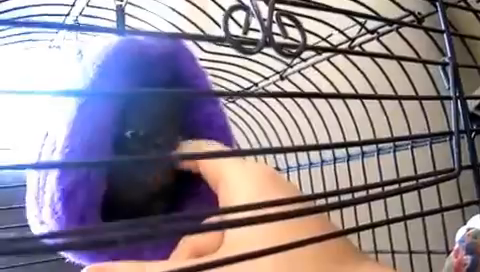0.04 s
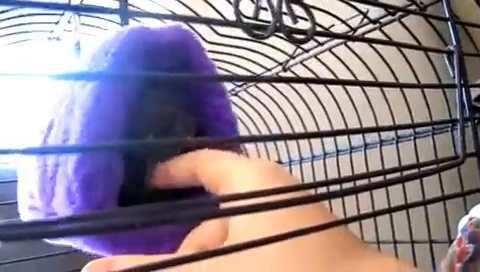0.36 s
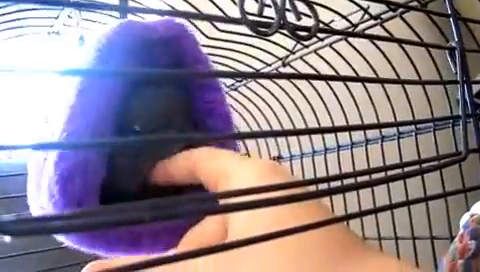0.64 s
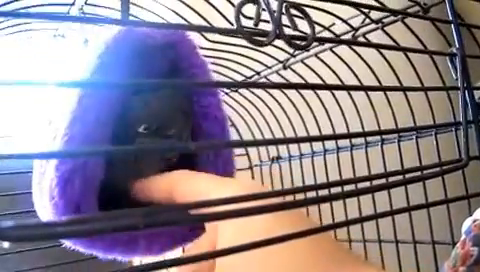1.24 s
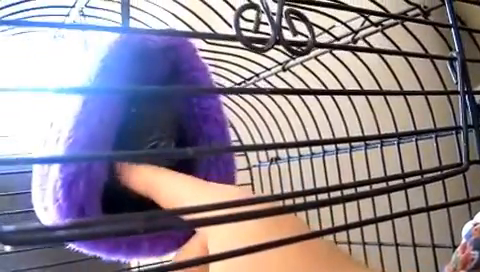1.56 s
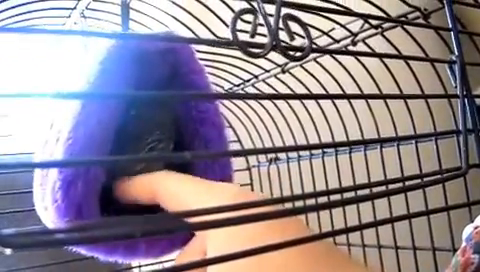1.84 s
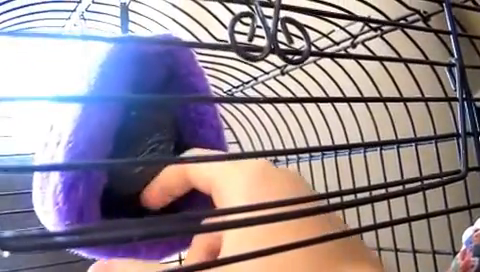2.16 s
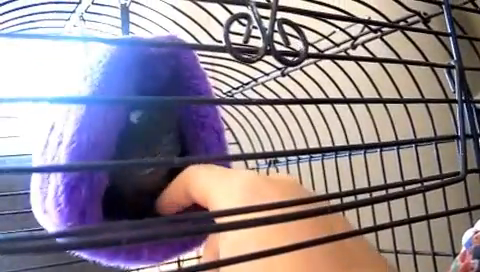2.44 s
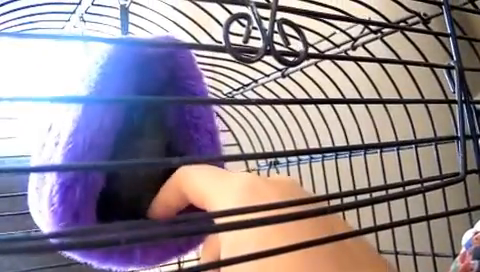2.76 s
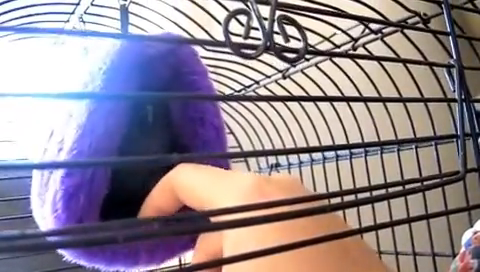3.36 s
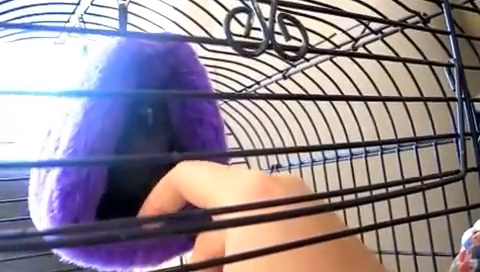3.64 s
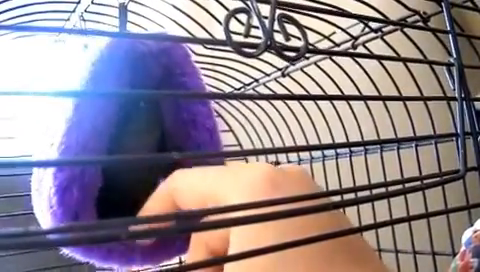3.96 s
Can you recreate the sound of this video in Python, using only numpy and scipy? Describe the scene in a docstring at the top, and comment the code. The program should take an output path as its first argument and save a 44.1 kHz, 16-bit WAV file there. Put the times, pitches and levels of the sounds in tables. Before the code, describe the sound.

One raspy parrot squawk bursts out close to the microphone in a small room. It follows a quiet stretch of low appliance hum, faint squeaks, a finger brushing the bird's cloth hut and two dry ticks in the cage.

```python
"""An appliance hums in a small room. Near the stereo microphones a finger rubs and nudges a parrot's
fabric hut inside a wire cage, with faint squeaks and two ticks of beak or claw. At the end the
pestered bird lets out one harsh squawk: an unsteady syrinx tone near 1.2 kHz, buried in chaotic
rasp and scattered by the cage and the room. The recorder's gain ducks under it."""
import sys
import numpy as np
from scipy import signal
from scipy.fft import rfft, irfft
from scipy.io import wavfile
from scipy.ndimage import uniform_filter1d

SR = 44100
rng = np.random.default_rng(int(sys.argv[2]) if len(sys.argv) > 2 else 0)


def put_to_file(sound):
    """Save the sound as 16-bit audio at rate SR, in the file named by the first command-line argument."""
    columns = np.atleast_2d(sound).T  # one column per channel
    safe = np.clip(columns, -1, 1)
    whole_steps = np.round(safe * 32767)
    wavfile.write(sys.argv[1], SR, whole_steps.astype(np.int16))


N = 176400
T = np.arange(N) / SR
CAGE_T60_S, ROOM_T60_S = 0.05, 0.24


def amp(db):
    """Decibels to gain."""
    return 10 ** (np.asarray(db) / 20)


def unit(x):
    """Scale to rms 1."""
    return x / np.sqrt(np.mean(x ** 2) + 1e-20)


def at_hz(points, hz):
    """Read a spectrum on a log-frequency axis."""
    freqs, values = np.transpose(points)
    return np.interp(np.log(hz + 1), np.log(freqs), values)


def colour(x, points):
    """Filter by a spectrum in dB."""
    size = 2 * x.shape[-1]
    gain = amp(at_hz(points, np.fft.rfftfreq(size, 1 / SR)))
    return irfft(rfft(x, size) * gain)[..., :size // 2]


def drift(rate_hz):
    """Smooth random wander with rms 1."""
    r = np.exp(-2 * np.pi * rate_hz / SR)
    return unit(signal.lfilter([1], [1, -2 * r, r * r], rng.standard_normal(N + SR))[SR:])


def resonate(x, hz, width_hz):
    """Resonance with gain 1 at its peak."""
    r = np.exp(-np.pi * width_hz / SR)
    poles = [1, -2 * r * np.cos(2 * np.pi * hz / SR), r * r]
    return signal.lfilter(np.array([1, 0, -1]) * (1 - r * r) / 2, poles, x)


# Likeness of the noise at the two microphones: (frequency [Hz], correlation [0-1])
MIC_LIKENESS = [(100, .96), (400, .93), (1000, 0.63), (3000, 0.2), (10000, 0.07)]
def stereo_noise(spectrum):
    """Coloured noise, alike at both microphones in the bass and diffuse in the treble."""
    mid, side = rfft(rng.standard_normal((2, N)))
    alike = at_hz(MIC_LIKENESS, np.fft.rfftfreq(N, 1 / SR))
    pair = np.sqrt(1 + alike) * mid + np.sqrt(1 - alike) * side * [[1], [-1]]
    return unit(colour(irfft(pair, N), spectrum))


# Room tone all around the microphones: (frequency [Hz], relative level [dB])
ROOM_AIR = [(15, -51), (25, -8), (82, -4), (148, -13), (198, -5.5), (253, -15.5), (297, -7.5), (495, -16),
            (567, -16.5), (684, -20.5), (826, -20), (2360, -29), (5430, -30), (12800, -38.5), (15500, -43)]
def room_tone():
    """Soft, steady noise, strongest in the bass."""
    return amp(-50) * stereo_noise(ROOM_AIR)


# Appliance in the background: (frequency [Hz], level [dB])
HUM_LINES = [(97.4, -56.5), (100.2, -57.5), (150, -62.5), (199.8, -52.5), (247, -63), (300, -54),
             (598, -69)]
def appliance_hum():
    """Slowly wavering hum lines; the lowest two beat."""
    hum = np.zeros(N)
    for hz, db in HUM_LINES:
        gain = np.sqrt(2) * amp(db + 1.1 * drift(1.4))
        hum += gain * np.sin(2 * np.pi * hz * T + rng.uniform(0, 2 * np.pi) + 0.071 * drift(0.71))
    return hum


def arch(start, length):
    """Half a sine: one rise and fall."""
    return np.sin(np.pi * np.clip((T - start) / length, 0, 1))


# Barely above the room tone: (time [s], length [s], pitch [Hz], level [dB])
FAINT_SQUEAKS = [(0.387, 0.16, 3110, -69), (0.587, 0.095, 1536, -64), (0.746, .1, 1650, -65)]
def squeaks():
    """Thin, wavering tones that swell and fade."""
    out = np.zeros(N)
    for start, length, hz, db in FAINT_SQUEAKS:
        phase = 2 * np.pi * np.cumsum(hz * (1 + 0.018 * drift(150))) / SR
        out += amp(db) * arch(start, length) * np.sqrt(2) * np.sin(phase)
    return out


def friction(strokes, spectrum, grain_db):
    """Grainy noise that swells and fades with each stroke."""
    swell = sum(amp(db) * np.sqrt(np.abs(arch(start, length))) for start, length, db in strokes)
    return swell * unit(stereo_noise(spectrum) * amp(grain_db * drift(86)))


# Finger on the hut, in the cage: (time [s], length [s], level [dB])
FINGER_RUBS = [(.245, 0.034, -54), (.272, 0.061, -58.5), (.33, 0.28, -61), (.65, 0.32, -62.5),
               (.924, 0.024, -54), (1.075, 0.029, -59), (1.3, 0.27, -64), (2.42, .2, -70),
               (2.74, 0.33, -59), (3.03, 0.27, -58), (3.25, 0.22, -65)]
HUT_NUDGES = [(.742, 0.1, -48.5), (3.107, 0.025, -45), (3.225, 0.012, -47.5)]
# Colour of the hut's cloth and of its body: (frequency [Hz], relative level [dB])
CLOTH_COLOUR = [(600, -27), (1600, -8), (2300, -8), (3100, -4.5), (5000, -3.5), (6200, -5.5), (7200, -3),
                (9000, -17), (15000, -30)]
HUT_COLOUR = [(80, 2), (200, 1), (340, -2), (410, 6), (520, 3), (680, -1.5), (1500, -14), (3000, -24),
              (9000, -40)]
def finger_on_hut():
    """Rubbing makes the cloth hiss; nudging draws a dull bump from the whole hut."""
    rubs = friction(FINGER_RUBS, CLOTH_COLOUR, grain_db=1.5)
    nudges = friction(HUT_NUDGES, HUT_COLOUR, grain_db=2)
    return rubs + nudges


# Beak or claw in the cage: (time [s], strike level [dB])
BEAK_TICKS = [(3.1893, -25.5), (3.286, -40)]
# What each tick rings: (frequency [Hz], relative level [dB], time to fall 60 dB [s])
TICK_RING = [(1270, -27, .012), (1520, -11.5, 0.012), (2800, -2, 0.0016), (4200, -6.5, 0.004),
             (5240, -14, 0.0032)]
def ticks():
    """Dry clicks ring a few very short modes, slightly scattered by the cage."""
    clicks = np.zeros(N)
    for start, db in BEAK_TICKS:
        clicks[int(start * SR)] += amp(db)
    t = T[:SR // 20]
    ring = sum(amp(db - 60 * t / t60) * np.sin(2 * np.pi * hz * t) for hz, db, t60 in TICK_RING)
    ring = signal.sosfilt(signal.butter(3, (1200, 5700), "band", fs=SR, output="sos"), ring)
    paths = (t == 0) + 0.034 * rng.standard_normal((2, len(t))) * amp(-60 * t / CAGE_T60_S)
    return signal.fftconvolve(signal.fftconvolve(clicks, ring)[None], paths, axes=1)[:, :N]


def echoes(sound, t60, first_echo_s=0.003, even_over_hz=122):
    """Dense, decaying reflections at each microphone, even over all pitches."""
    t = T[:SR // 2]
    paths = rfft(rng.standard_normal((2, len(t))) * amp(-60 * t / t60) * (t > first_echo_s))
    power = uniform_filter1d(np.abs(paths) ** 2, int(even_over_hz * t[-1]), axis=1)
    tail = irfft(paths / np.sqrt(power))[:, :len(t) // 2]
    return signal.fftconvolve(sound[None], tail, axes=1)[:, :N]


# Scattered over direct sound at the microphones: (frequency [Hz], ratio [dB])
SCATTER_RATIO = [(500, -16.5), (1200, -2), (2400, 1.5), (4000, 4), (8000, 16.5)]
# Left microphone over right: (frequency [Hz], ratio [dB])
MIC_BALANCE = [(500, 0), (1150, -4.5), (1700, -0.5), (2400, 0), (3600, 2), (5000, 4.5), (6000, -1.5),
               (7200, -13), (8500, -7.5)]
def cage_and_room(voice, head_turn_hz=0.798, right_lag_s=38.27e-6):
    """Direct sound, quick cage scatter that shifts as the head moves, and a short room tail."""
    sent = colour(voice, SCATTER_RATIO)
    turn = 2 * np.pi * head_turn_hz * T
    bars = echoes(sent * np.cos(turn), CAGE_T60_S) + echoes(sent * np.sin(turn), CAGE_T60_S)
    wall_gain = amp(-0.5)
    walls = wall_gain * echoes(sent, ROOM_T60_S)
    direct = np.array([voice, np.interp(T - right_lag_s, T, voice)])
    pair = direct + (bars + walls) / np.hypot(1, wall_gain)
    # scattering spreads the power without adding to it
    pair = colour(pair, [(hz, -10 * np.log10(1 + amp(db) ** 2)) for hz, db in SCATTER_RATIO])
    return np.array([colour(mic, [(hz, sign * db / 2) for hz, db in MIC_BALANCE])
                     for mic, sign in zip(pair, (1, -1))])


# Syrinx harmonics: (multiple of the pitch, opening level [dB], pressed level [dB])
SYRINX_HARMONICS = [(1, -14.5, -23), (2, -2, -3), (3, -10.5, -7), (4, -18.5, -9), (5, -17, -17),
                    (6, -20.5, -26.5)]
# Rasp in throat and beak: (frequency [Hz], relative level [dB])
RASP_COLOUR = [(250, -27), (500, -32.5), (800, -16.5), (1080, -18), (1400, -16), (1650, -1), (2050, 1),
               (2450, 1), (2900, -1), (3400, -3), (3880, -5.5), (4200, -7.5), (5100, -5), (5800, -11),
               (7300, -18), (8000, -27), (8600, -30), (9000, -48), (15000, -58)]
def syrinx(pitch_hz, press):
    """A jittering tone, rougher when pressed, and turbulence that pulses with each cycle."""
    jitter = (0.0202 + 0.0045 * press) * drift(413)
    wobble = 0.009 * drift(69.7)
    phase = 2 * np.pi * np.cumsum(pitch_hz * (1 + jitter + wobble)) / SR
    tone = np.zeros(N)
    for multiple, opening_db, pressed_db in SYRINX_HARMONICS:
        gain = np.sqrt(2) * amp(opening_db + (pressed_db - opening_db) * press)
        tone += gain * np.sin(multiple * phase + rng.uniform(0, 2 * np.pi))
    turbulence = rng.standard_normal(N) * (1 + 0.67 * np.cos(phase))
    return tone, unit(colour(turbulence, RASP_COLOUR))


# The call from inside the hut: (time [s], level [dB], pitch [Hz], lift of the clear tone [dB])
SQUAWK_PATH = [(3.564, -45, 1121, 4), (3.575, -36, 1126, -2), (3.606, -24, 1122, -4),
               (3.625, -20, 1126, -15), (3.636, -19.5, 1131, 0.5), (3.672, -15.5, 1142, -5),
               (3.686, -12.5, 1152, 1), (3.695, -12.5, 1159, -11.5), (3.731, -11.5, 1167, 1),
               (3.75, -10.5, 1184, -1), (3.776, -8.5, 1198, -3), (3.819, -8.5, 1225, -4),
               (3.879, -7.5, 1248, -1.5), (3.934, -7.5, 1277, 0.5), (3.975, -8.5, 1242, -1),
               (4.0, -9, 1233, -1.5)]
# Sharp airway resonances: (frequency [Hz], width [Hz], added share [dB])
AIRWAY_MODES = [(1120, 91, -6.5), (2290, 230, -6), (3614, 156, 2.5), (5040, 130, -6.5), (7400, 250, -5)]
def parrot_squawk(press_s=(3.5, 3.83), treble_hz=4000):
    """Tone and rasp ring the airway, shaken by an uneven flutter that eases as the bird presses."""
    times, *columns = np.transpose(SQUAWK_PATH)
    level_db, pitch_hz, clear_db = [np.interp(T, times, column) for column in columns]
    press = np.interp(T, press_s, [0, 1])
    tone, rasp = syrinx(pitch_hz, press)
    voice = amp(clear_db - 3.5) * tone + amp(-4.5) * rasp
    voice = voice + sum(amp(db) * resonate(voice, hz, width) for hz, width, db in AIRWAY_MODES)
    low = signal.sosfiltfilt(signal.butter(2, treble_hz, fs=SR, output="sos"), voice)
    treble_db = 0.35 * (level_db + 22) + 4 * press  # brighter when loud and when pressed
    voice = low + (voice - low) * amp(treble_db)
    flutter_db = (2.5 - 2 * press) * np.clip(drift(170), -2, 2)
    return voice * amp(level_db + flutter_db) * (T > times[0])


def scene():
    """The room and the small noises sit slightly right; the bird rises far above them."""
    quiet = appliance_hum() + room_tone() + finger_on_hut() + ticks() + squeaks()
    return quiet * amp([[-1], [1]]) + cage_and_room(parrot_squawk())


def record(dry, limit_db=-15, sense_s=0.0043, attack_s=0.02, release_db_per_s=1, cutoff_hz=15750):
    """The recorder's gain ducks quickly and recovers slowly; the top treble is cut."""
    power = uniform_filter1d(np.mean(dry ** 2, axis=0), int(sense_s * SR))
    over_db = np.maximum(10 * np.log10(np.abs(power) + 1e-12) - limit_db, 0)
    held_db = np.maximum.accumulate(over_db + release_db_per_s * T) - release_db_per_s * T
    r = np.exp(-1 / (attack_s * SR))
    duck_db = signal.lfilter([1 - r], [1, -r], held_db)
    end_fade = np.sin(np.pi / 2 * np.clip((T[-1] - T) / 0.003, 0, 1)) ** 2
    lowpass = signal.ellip(12, 0.1, 80, cutoff_hz, fs=SR, output="sos")
    return signal.sosfilt(lowpass, dry * amp(-duck_db) * end_fade)


dry = scene()
out = record(dry)
put_to_file(out)
```